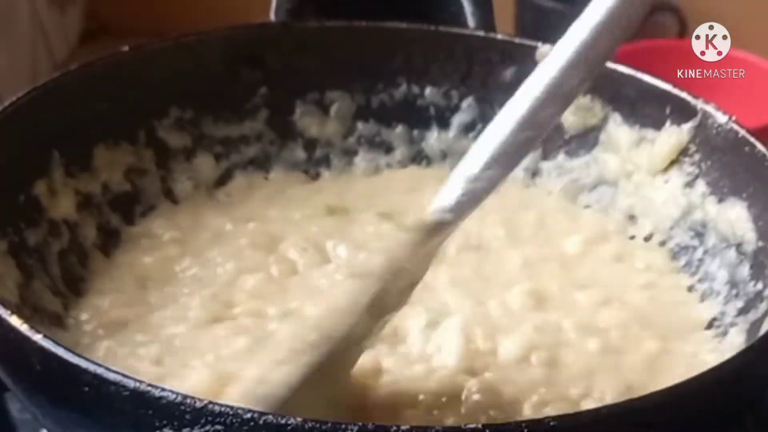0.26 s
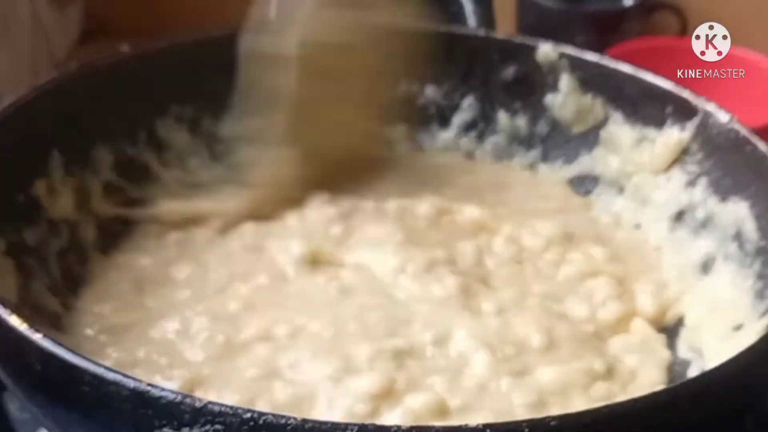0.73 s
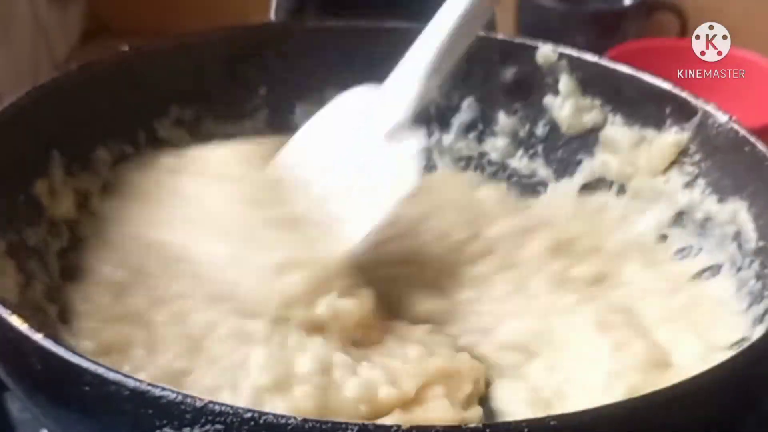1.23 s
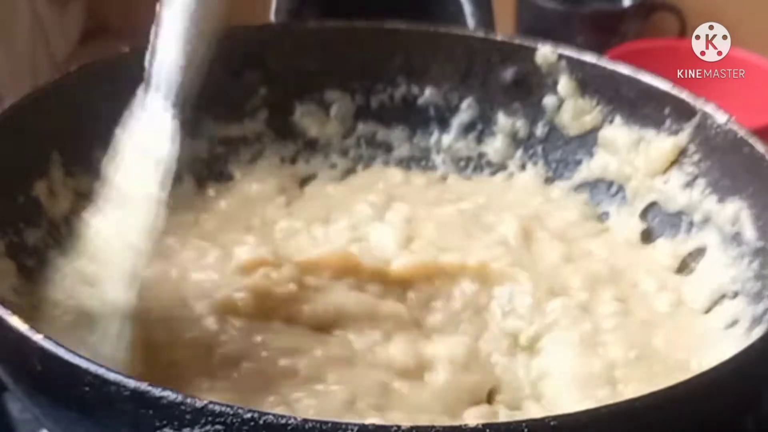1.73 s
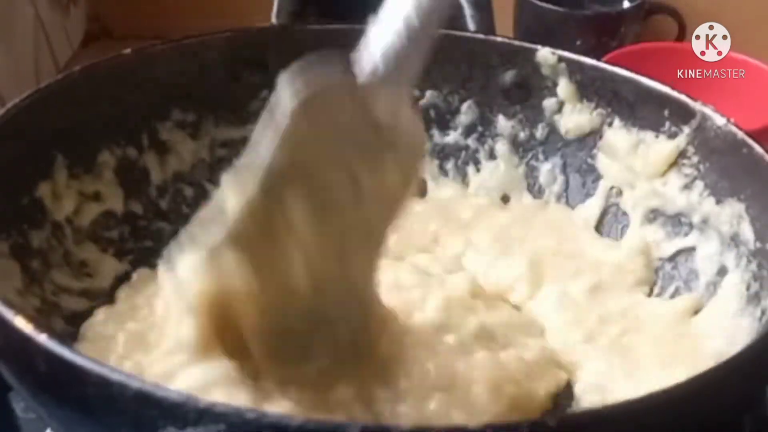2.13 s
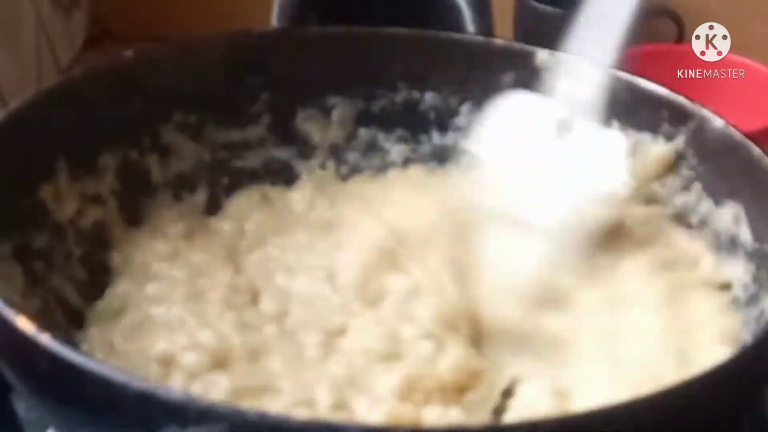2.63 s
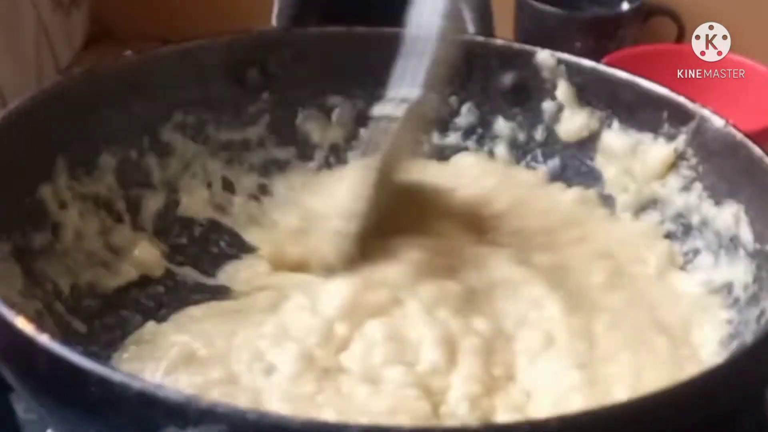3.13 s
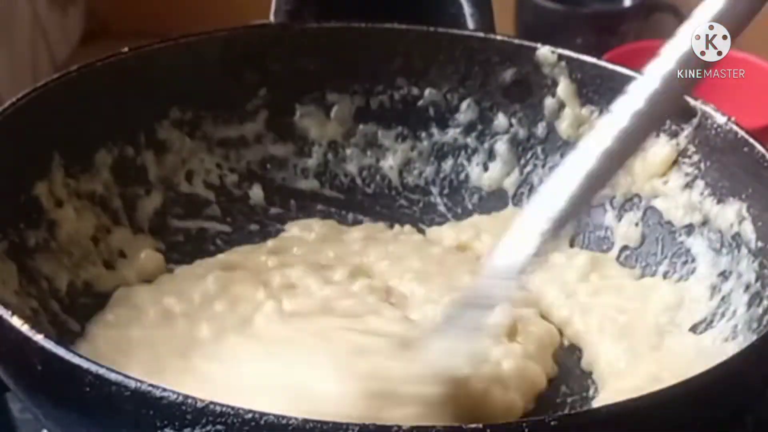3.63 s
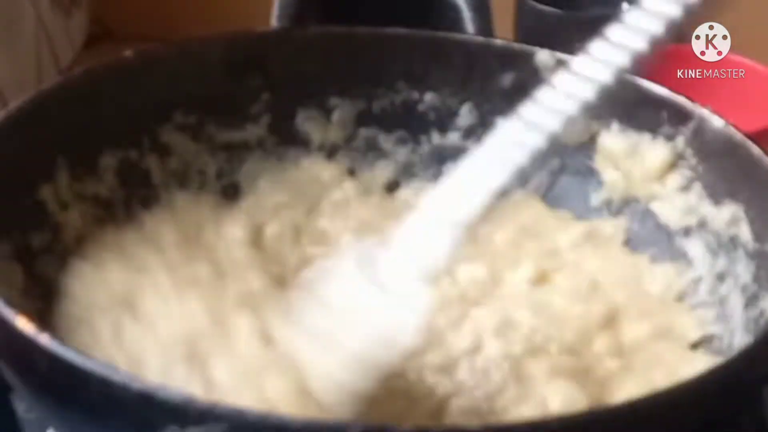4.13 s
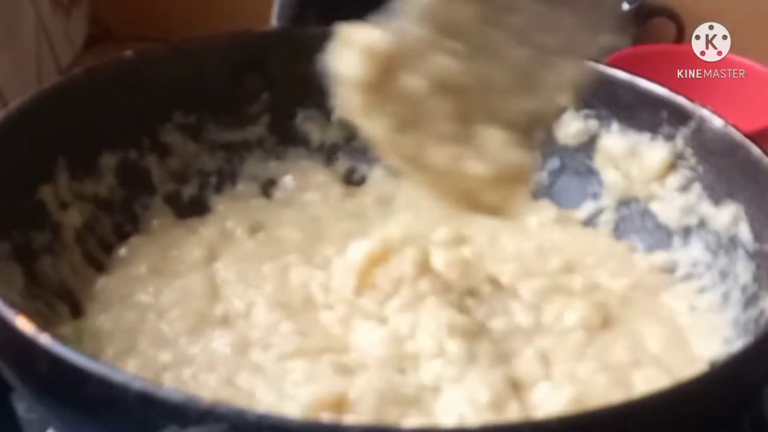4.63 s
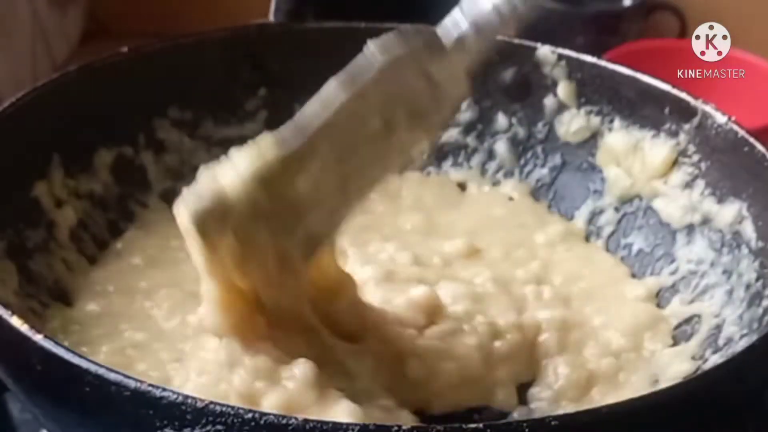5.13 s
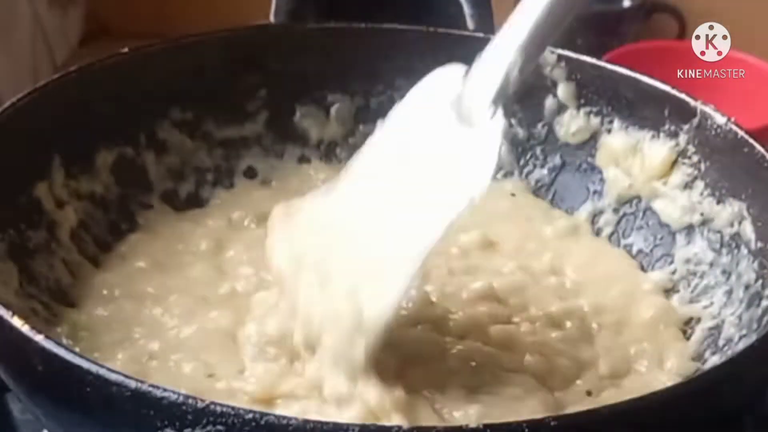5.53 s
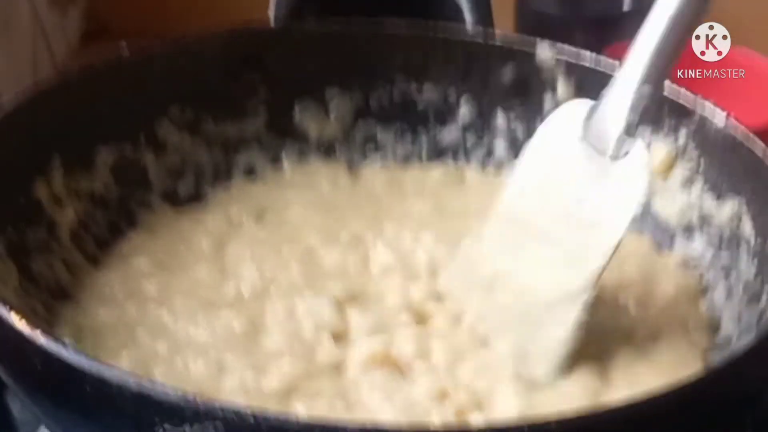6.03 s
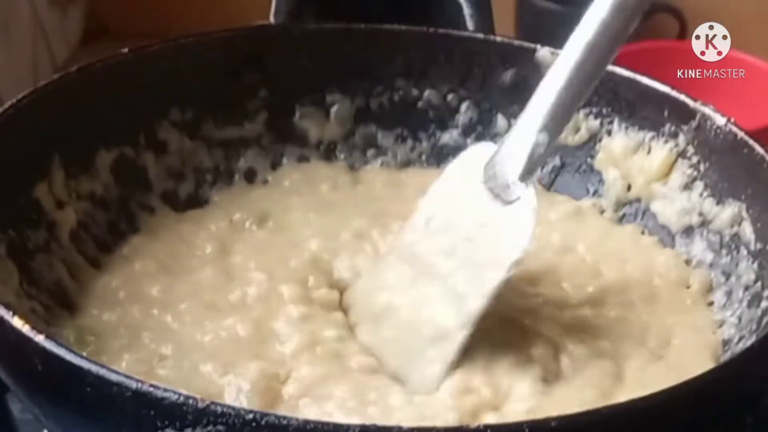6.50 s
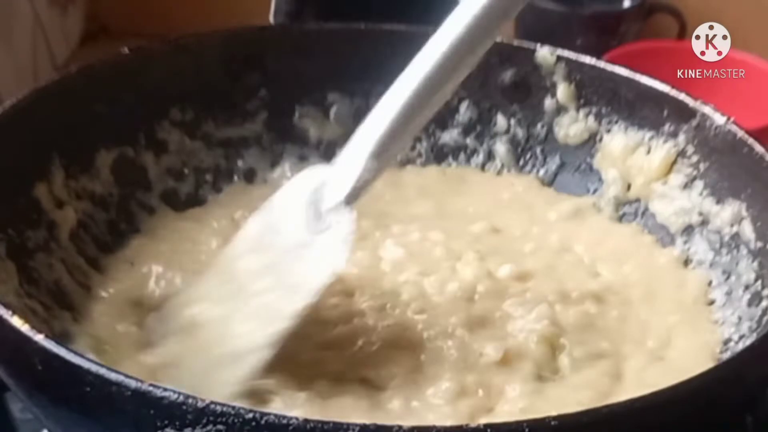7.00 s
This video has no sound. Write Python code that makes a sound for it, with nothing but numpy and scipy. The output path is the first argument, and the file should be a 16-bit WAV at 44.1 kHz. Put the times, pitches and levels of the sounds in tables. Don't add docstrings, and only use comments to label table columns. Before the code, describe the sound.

Uneven stirring in a heavy pan: rough metal scrapes come in bursts, with dull thuds cushioned by dough and bright, quickly damped knocks. Later the strokes stop and a steady tapping takes over, about six or seven chops a second. Quiet simmering and a thin burner whistle stay underneath. Close phone microphone, dry small kitchen, slight stereo width in the bright grit.

```python
import sys
import numpy as np
from scipy import signal
from scipy.fft import rfft, irfft
from scipy.io import wavfile
from scipy.ndimage import uniform_filter1d

SR = 44100
rng = np.random.default_rng(int(sys.argv[2]) if len(sys.argv) > 2 else 0)


def transcribe(signal):
    frames = np.atleast_2d(signal).T
    limited = np.clip(frames, -1, 1)
    pcm = np.round(limited * 32767).astype(np.int16)
    wavfile.write(sys.argv[1], SR, pcm)


def elevation(decibels):
    levels = np.asarray(decibels, float)
    return 10 ** (levels / 20)


N = 320166

# (frequency [Hz], likeness [0 to 1, values below 0 count as 0])
LIKENESS = [(60, -0.2), (240, 1), (950, 0.38), (3770, 0.084), (15000, -0.91)]
# (frequency [Hz], level [dB], time to fade by 60 dB [s])
THUD_TONES = [(110, -4.5, 0.1), (166, -8.5, 0.18), (223.2, -12.5, 0.22), (304, 4.5, 0.083), (441, -5, 0.16)]
BOWL_TONES = [(659, -7.5, 0.19), (704.3, 0.5, 0.093), (808.8, 6, 0.1), (863.4, -9.5, 0.2), (977, -7, 0.11)]
WALL_TONES = [(1125, 1, .11), (1340, -4, .09), (1600, -3, .09), (1750, -4, .08), (2000, -6, .08)]
BLADE_TONES = [(2570, -14, .07), (2720, -11, .08), (2860, 0, .1), (2990, -9, .07)]
EDGE_TONES = [(3330, -5, 0.04), (4460, -36, 0.02), (4920, 3, 0.03), (4692, 7.5, 0.03), (5146, 2, 0.034)]
GRIT_TONES = [(7400, -26, 0.0049), (11330, 19, 0.021), (14140, -12, .004)]
# (low edge [Hz], high edge [Hz], clatter over the tones [dB],
# crack over the tail [dB], time for the tail to fade by 60 dB [s], left-right likeness [0 to 1])
PARTS = [(150, 624, -1.5, -11, 0.2, 0.93), (512, 1176, -2.5, 7.5, 0.16, 0.91),
         (1068, 2130, 2, 8.5, 0.17, 0.58), (2440, 3280, -1, 5, 0.16, 0.29),
         (3360, 5480, 1.9, 9.5, 0.15, 0.41), (5840, 16500, 11.5, 4.5, 0.15, 0.096)]


def evened(x):
    return x / np.sqrt(np.mean(x ** 2) + 1e-20)


def read(points, hz):
    f, value = np.transpose(points)
    return np.interp(np.log(hz + 1), np.log(f + 1), value)


def add(mix, s, sound):
    part = mix[:, round(s * SR):][:, :sound.shape[1]]
    part += sound[:, :part.shape[1]]


def paired(a, b, same):
    same = np.clip(same, 0, 1)
    return np.array([a, same * a + np.sqrt(1 - same ** 2) * b])


def kitchen(level_db=-55.5, patchy_db=-1.5, swell_db=-0.74):
    # (frequency [Hz], level [dB per Hz])
    air_colour = [(35, -45), (60, -21), (179, 0.5), (319, -17), (358, -50), (432, -3), (496, -14),
                  (671, -13), (1440, -16), (1550, -8), (1660, -21), (1820, -13), (2960, -10),
                  (11100, -17.5), (15400, -7.5)]
    frames, hz = N // 256 + 5, np.fft.rfftfreq(1024, 1 / SR)
    a, b, c, d, patches = rng.standard_normal((frames, 513, 5)).T
    swell = evened(uniform_filter1d(patches[0], 30))
    patches = uniform_filter1d(patches, 14, 0)
    patches = evened(uniform_filter1d(patches, 12, 1))
    spectra = paired(a + 1j * b, c + 1j * d, read(LIKENESS, hz)[:, None])
    spectra = spectra * elevation(read(air_colour, hz)[:, None] + patchy_db * patches + swell_db * swell)
    noise = signal.istft(spectra, nperseg=1024, noverlap=768)[1][:, :N]
    return elevation(level_db) * evened(noise)


def whistle(hz, width):
    r = np.exp(-np.pi * width / SR)
    noise = paired(*rng.standard_normal((2, N)), read(LIKENESS, hz))
    resonance = [1, -2 * r * np.cos(2 * np.pi * hz / SR), r * r]
    return evened(signal.lfilter([1, 0, -1], resonance, noise))


def flame(roar_db=-78, waver_db=4.5, waver_s=0.11):
    # (frequency [Hz], width [Hz], level [dB])
    gas_tones = [(320.7, 13, -76), (14000, 40, -75), (14465, 40, -68), (14680, 45, -90), (15200, 60, -68)]
    size = round(waver_s * SR)
    waver = uniform_filter1d(rng.standard_normal(N), size)
    waver = evened(uniform_filter1d(waver, size))
    roar = elevation(roar_db + waver_db * waver) * whistle(175, 28)
    return roar + sum(elevation(db) * whistle(hz, width) for hz, width, db in gas_tones)


def answer(modes, part, centre_hz, damping=1, focus_db=13.0, spread_db=4.5, crack_t60=0.0064):
    # (frequency [Hz], level [dB per Hz])
    clatter_colour = [(47, -58), (80, -13), (287, -14), (365, -19), (436, -8.5), (633, -16), (807, 0),
                      (1250, -9), (1780, -9), (2270, -9.5), (2890, -7.5), (3300, -20), (4900, -20.5),
                      (6820, -21), (15400, -26)]
    lo_hz, hi_hz, clatter_db, crack_db, t60, same = part
    t = np.arange(6000) / SR
    hz, db, decay = np.transpose(modes)[:, :, None]
    weight, detune, turn = rng.standard_normal((len(modes), 3)).T[:, :, None]
    db = db + focus_db * np.exp(-(np.log2(hz / centre_hz) / 0.18) ** 2)
    rise = 1 - np.exp(-t * hz / 4.0)
    height = elevation(db + spread_db * weight - 60 * damping * t / decay) * rise
    phase = 2 * np.pi * hz * (1 + 0.0093 * detune) * t
    shift = turn * (1 - same) * 3.63
    rings = np.array([(height * np.sin(phase + side * shift)).sum(0) for side in (-1, 1)])

    noise = paired(*rng.standard_normal((2, len(t))), same)
    noise = irfft(rfft(noise) * elevation(read(clatter_colour, np.fft.rfftfreq(len(t), 1 / SR))))
    tail = elevation(-60 * damping * t / t60)
    crack = elevation(crack_db - 60 * t / crack_t60)
    band = signal.butter(3, [lo_hz, hi_hz], "bandpass", fs=SR, output="sos")
    clatter = signal.sosfilt(band, noise * (tail + crack))
    both = evened(rings) + elevation(clatter_db) * evened(clatter)
    both[1] = np.roll(both[1], 2)
    return evened(both) / np.sqrt(len(t))


def shares(thud_db, centre_hz, blade_db, fall_db=5.0):
    # (frequency [Hz], level [dB])
    pan_zones = [(800, -6.5), (1500, -4)]
    pan_db = [db - fall_db * np.log2(centre_hz / hz) ** 2 for hz, db in pan_zones]
    return [thud_db] + pan_db + list(blade_db)


def spots(centre_hz, count=5, damping=1.55):
    tones = (THUD_TONES, BOWL_TONES, WALL_TONES, BLADE_TONES, EDGE_TONES, GRIT_TONES)
    return [[answer(modes, part, centre_hz, damping, spread_db=3.0) for _ in range(count)]
            for modes, part in zip(tones, PARTS)]


def stroke(row, replies, centre_hz, ring_db, slips_per_s=1900, size_db=3.0, judder_db=2.6, turns_per_s=5.74):
    peak, rise, fall, bowl_db, edge_db = row
    t = np.arange(max(-1.3 * rise, -peak), 1.3 * fall, 1 / SR)
    under_db = 21.5 * np.where(t < 0, -t / rise, t / fall) ** 1.79
    blade_db = [db + 0.12 * under_db for db in (ring_db + 0.47 * edge_db, edge_db, edge_db - 1.5)]

    draw, size, sign = rng.random((8000, 3))[np.arange(len(t)) % 8000].T
    slips = (draw < slips_per_s / SR) * elevation(-size_db * np.log(size + .01)) * np.sign(sign - .5)
    slips = slips / np.sqrt(uniform_filter1d(slips ** 2, 700) + 1e-9)
    out = 0
    for part, db in zip(replies, shares(-18, centre_hz, blade_db)):
        judder = uniform_filter1d(rng.standard_normal(16000), 200)
        judder = evened(uniform_filter1d(judder, 200))[:len(t)]
        force = evened(slips * elevation(judder_db * np.resize(judder, len(t))))
        force = force * elevation(bowl_db - under_db + db)
        turn = 2 * np.pi * (turns_per_s * t + rng.random())
        for share, spot in zip((np.cos(turn), np.sin(turn)), rng.permutation(len(part))):
            out = out + signal.fftconvolve((force * share)[None], part[spot], axes=1)
    return peak + t[0], elevation(3.0) * out


def blow(peak_db, ring_db, edge_db, centre_hz, knock_db, thud_db, grit_db, spark_db, energy_db=22, knock_hz=1500):
    spark_part = (11400, 15700, 39, 12, 0.12, 0.07)
    grit_level = edge_db + grit_db
    levels = shares(thud_db, centre_hz, (ring_db, edge_db, grit_level, grit_level + spark_db))
    tones = (THUD_TONES, BOWL_TONES, WALL_TONES, BLADE_TONES, EDGE_TONES, GRIT_TONES, GRIT_TONES)
    sets = zip(tones, PARTS + [spark_part], levels)
    rings = sum(elevation(db + energy_db) * answer(modes, part, centre_hz) for modes, part, db in sets)
    u = np.arange(rings.shape[1]) / SR * knock_hz
    knock = -np.sin(2 * np.pi * u) * 4 * u * np.exp(-1.9 * u)
    return elevation(peak_db) * (rings + elevation(knock_db) * np.array([knock, np.roll(knock, 2)]))


def touch(row, size=256):
    burst = rng.standard_normal(size) * np.hanning(size)
    contacts = irfft(np.exp(1j * np.angle(rfft(burst))), size)
    tap = blow(*row, knock_db=-20.5, thud_db=-15, grit_db=1.3, spark_db=-14)
    return signal.fftconvolve(tap, contacts[None], axes=1)


def lump(db, hz, rise_s=0.013, t60=0.15):
    t = np.arange(8000) / SR
    height = (1 - np.exp(-t / rise_s)) * elevation(db + 9.5 - 60 * t / t60)
    swell = height * np.sin(2 * np.pi * hz * t)
    return np.array([swell, swell])


def scene():
    # (peak time [s],
    # rise [s], fall [s], pan bowl level [dB], blade edge above the bowl [dB])
    near = [(0.115, 0.029, 0.055, -37, -13), (0.16, 0.044, 0.063, -37, -14.5),
            (0.47, .11, 0.11, -40.5, -18), (0.645, 0.026, 0.084, -58.5, -13), (0.82, .06, 0.061, -38, -11),
            (0.875, 0.048, 0.06, -42.5, -8.5), (1.86, 0.044, 0.21, -49, -13),
            (2.662, 0.014, 0.023, -42, -11), (3.52, .04, 0.17, -40.5, -19), (3.55, .03, 0.06, -46.5, -5.5),
            (3.74, 0.066, 0.028, -43, -6), (5.2, 0.047, 0.081, -58, -12), (6.361, 0.032, .04, -58, -30)]
    centre = [(0.006, 0.058, 0.038, -33, -16.5), (0.076, 0.028, 0.046, -47, -24),
              (0.315, 0.021, 0.039, -46.5, -13), (0.752, .009, 0.093, -48, -21),
              (1.26, 0.061, 0.089, -50, -2), (1.3, 0.024, 0.05, -35, -9.5), (1.372, .012, .04, -50.5, 1.5),
              (2.586, 0.055, 0.052, -36.5, -8.5), (2.78, .045, 0.068, -37, -8),
              (3.23, 0.11, 0.078, -41, -16), (3.28, 0.035, 0.026, -52.5, 1.5),
              (4.188, 0.076, 0.071, -41, -10.5)]
    far = [(1.482, .025, 0.065, -36, -7), (1.96, .12, 0.12, -35, -19), (2.09, 0.028, 0.056, -41.5, -4.5),
           (3.66, 0.15, 0.16, -42.5, -7.5), (4.27, .04, 0.051, -52.5, -1.5),
           (4.397, 0.052, 0.038, -41.5, -9), (4.48, .06, 0.023, -54, 3), (4.824, 0.026, 0.051, -60, -27),
           (4.974, 0.03, 0.026, -58.5, -30)]
    singing = [(1.418, 0.036, .035, -45, -3), (2.53, 0.025, 0.041, -51, -18),
               (2.711, .03, 0.044, -48.5, -3), (4.305, .035, 0.045, -50, -3.5), (3.25, .05, .05, -54, 3),
               (3.66, .05, 0.073, -51.5, 1.5), (4.11, .012, .05, -65, -12), (4.37, .03, 0.027, -55, 7.5)]
    # (centre of the bowl's tone [Hz], blade ring above the bowl [dB])
    places = [
        (695, -12.5),
        (840, -8.5),
        (1026, -5.5),
        (860, 5),
    ]
    # (time [s], bowl peak level [dB], blade ring above it [dB],
    # edge above it [dB], centre of the bowl's tone [Hz])
    touches = [(0.097, -24.5, -20, -34, 650), (0.303, -37.5, 0.5, -5.5, 790), (0.385, -29, -17, -27, 700),
               (0.746, -36, -11, -14.5, 810), (1.226, -40.5, 6.5, -6.5, 1150),
               (1.553, -32, -18, -15.5, 860), (1.823, -24, -16, -22, 675), (2.51, -40.5, 2.5, -4.5, 805),
               (2.574, -30.5, -10, -8, 816), (3.102, -23.5, -19.5, -19.5, 685),
               (3.481, -28, -20, -17.5, 780), (4.1, -42.5, -1, -8.5, 950), (5.106, -32, -3, -9.5, 980)]
    blows = [
        (1.121, -25.5, -16.5, -17, 920),
        (1.293, -25.5, -14, -13, 815),
        (1.476, -25.5, -19, -9.5, 1500),
        (1.481, -25.5, -10, -21, 820),
        (2.072, -28.5, -6.5, -16, 1150),
        (2.38, -23.5, -12, -12.5, 885),
        (2.854, -38.5, -21, -26, 1100),
        (2.873, -47.5, -7, -7, 969),
        (4.16, -24.5, -11, -10, 830),
        (4.387, -32.5, -14, -9, 1060),
    ]
    ticks = [(1.17, -23.5, -19, -20.5, 670), (1.358, -24, -21, -13, 780), (2.649, -25, -19, -13.5, 695),
             (2.772, -29.5, -0.5, -16, 799), (3.214, -28, -10, -13, 870), (3.613, -27, -5.5, -13, 1080)]
    chops = [(4.869, -30, -2.5, -6.5, 1200), (5.336, -32, -6.5, -10, 840), (5.513, -16, -24, -19, 1130),
             (5.522, -26, -2, -4.5, 970), (5.674, -27, -7.5, -9, 880), (5.82, -18, -12, -9, 860),
             (5.965, -18, -20, -9, 880), (6.1, -17.5, -12.5, -8.5, 970), (6.243, -24, -4.5, -5, 1010),
             (6.4, -21, -33, -6, 1065), (6.564, -25, -13, -5, 1200), (6.723, -27, -14.5, -5, 900),
             (6.879, -32.5, -9, -14, 999), (7.038, -24.5, -21, -15.5, 1620), (7.212, -22, -15.5, -13, 1540)]
    # (time [s], level [dB], frequency [Hz])
    lumps = [(0.402, -45.5, 236), (0.842, -46.5, 441), (2.38, -53.5, 166), (2.65, -54.5, 166),
             (2.782, -56, 150), (3.099, -60, 304), (5.518, -58, 135), (5.819, -50, 110), (6.402, -57, 304),
             (6.566, -47, 304), (6.882, -58, 138)]

    mix = kitchen() + flame()
    shift_s = .0015
    for rows, place in zip((near, centre, far, singing), places):
        replies = spots(place[0])
        for row in rows:
            add(mix, *stroke(row, replies, *place))
    for s, *row in touches:
        add(mix, s - shift_s, touch(row))
    for s, *row in lumps:
        add(mix, s, lump(*row))
    for s, *row in blows:
        add(mix, s + shift_s, blow(*row, knock_db=-8, thud_db=-19, grit_db=-2.2, spark_db=-6))
    for s, *row in ticks:
        add(mix, s + shift_s, blow(*row, knock_db=-0.5, thud_db=-18, grit_db=-4.0, spark_db=-3, energy_db=20))
    for s, *row in chops:
        add(mix, s + shift_s, blow(*row, knock_db=-3.0, thud_db=-15, grit_db=-2.5, spark_db=0.5))
    return mix


def low_pass(x):
    return signal.sosfilt(signal.butter(12, 16650, fs=SR, output="sos"), x)


def record(dry):
    # (frequency [Hz], level [dB])
    response = [(0, -12), (60, -7), (135, 0), (9300, 0), (10000, -5), (10700, 0), (15350, 0), (15600, -32),
                (22050, -40)]
    hz, db = np.transpose(response)
    colour = signal.firwin2(2047, hz, elevation(db), fs=SR)
    ports = dry * elevation([[-.2], [.2]])
    heard = signal.oaconvolve(ports, colour[None], "same", axes=1)
    return low_pass(heard)


dry = scene()
out = record(dry)
transcribe(out)
```